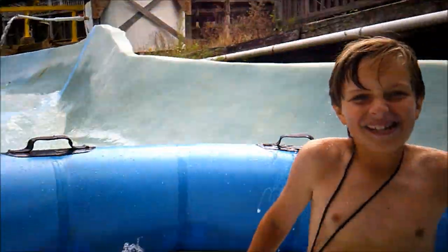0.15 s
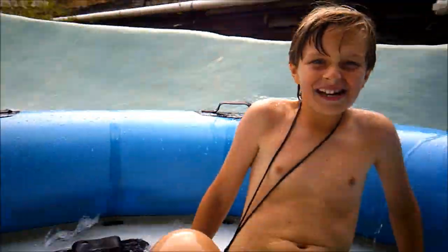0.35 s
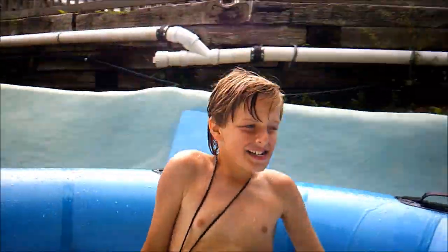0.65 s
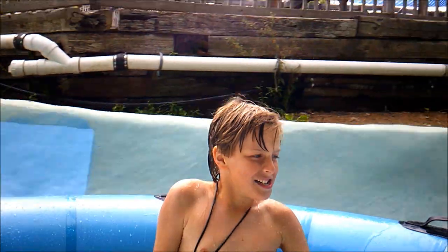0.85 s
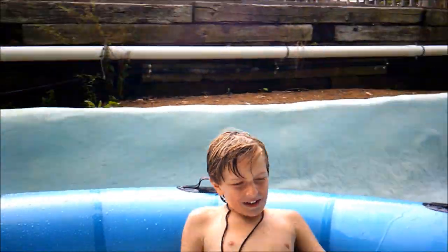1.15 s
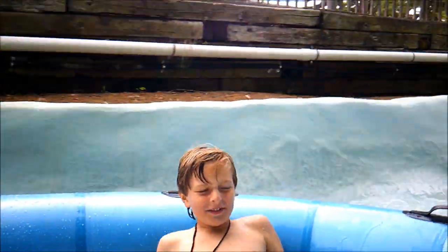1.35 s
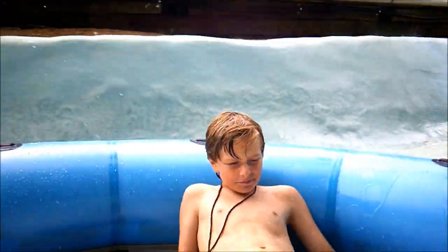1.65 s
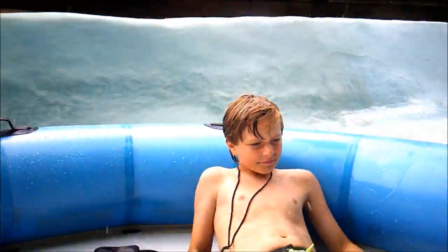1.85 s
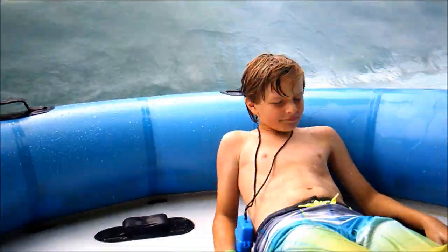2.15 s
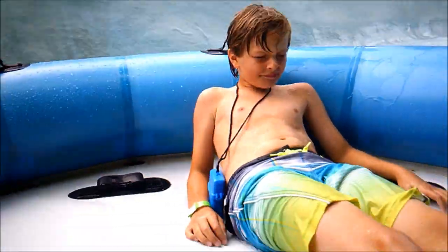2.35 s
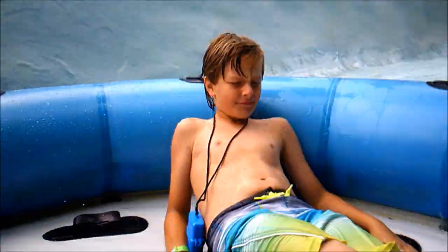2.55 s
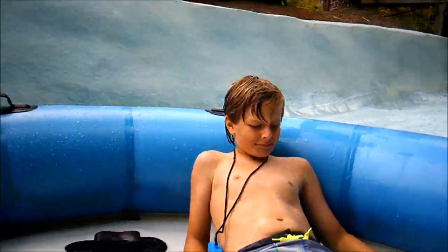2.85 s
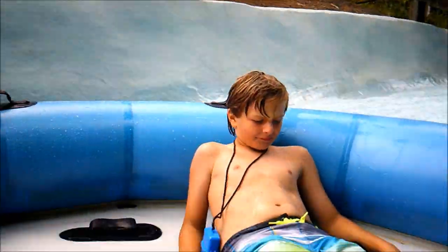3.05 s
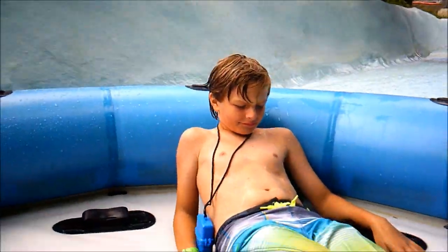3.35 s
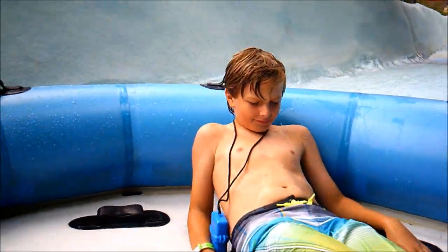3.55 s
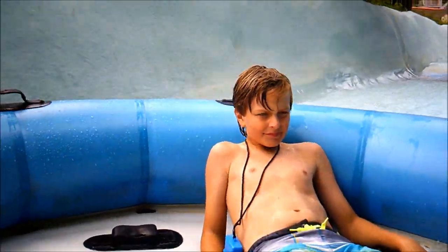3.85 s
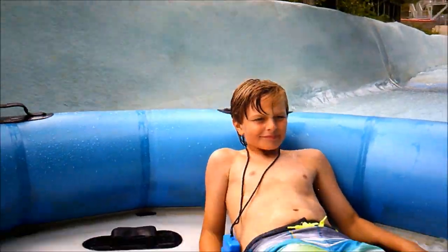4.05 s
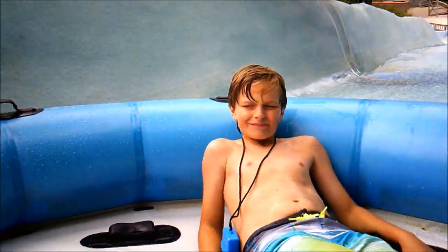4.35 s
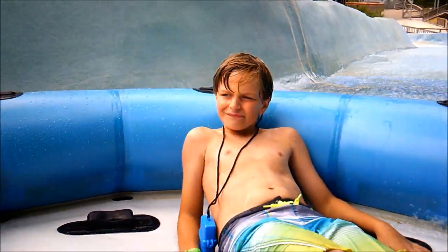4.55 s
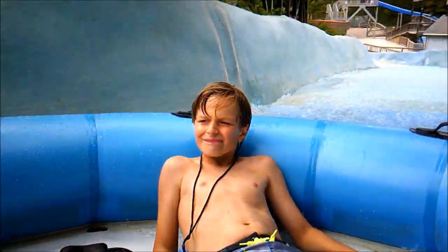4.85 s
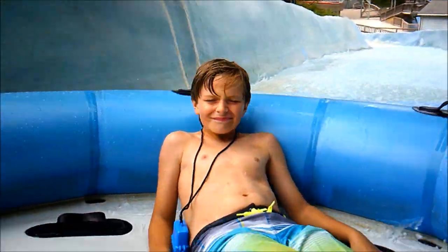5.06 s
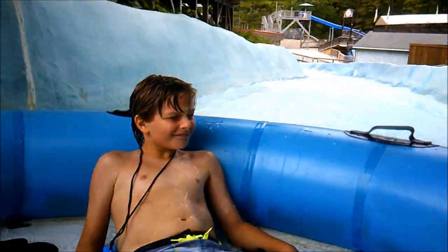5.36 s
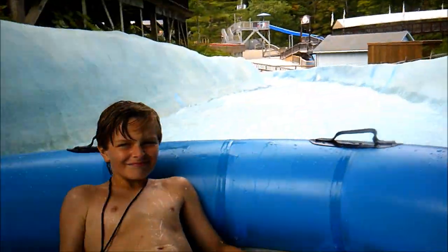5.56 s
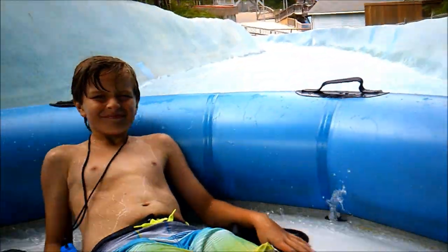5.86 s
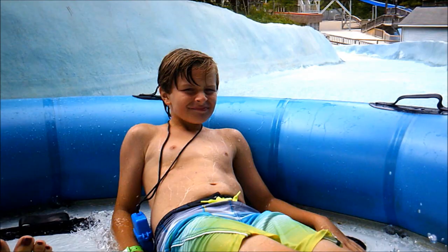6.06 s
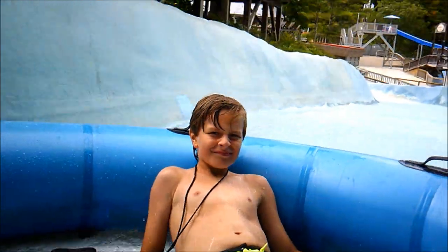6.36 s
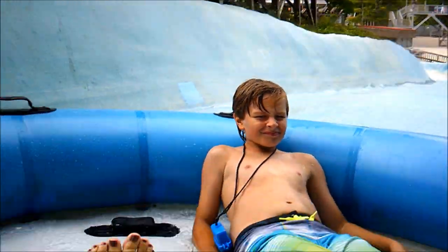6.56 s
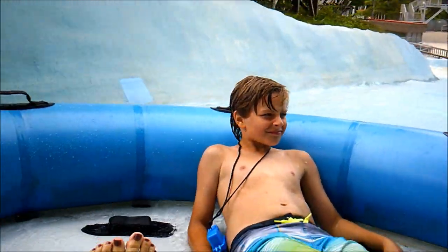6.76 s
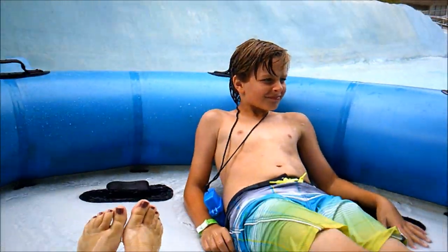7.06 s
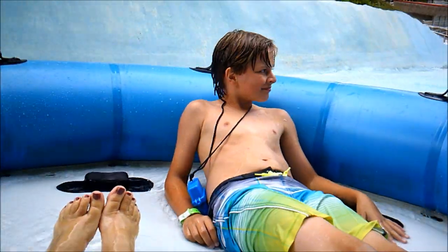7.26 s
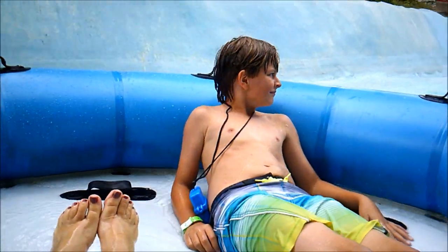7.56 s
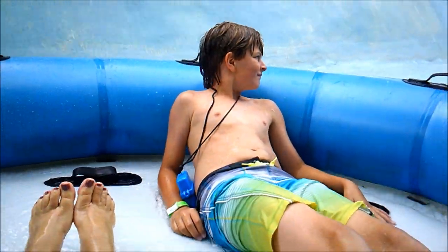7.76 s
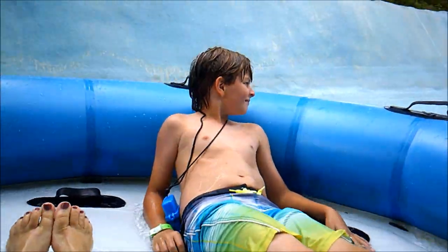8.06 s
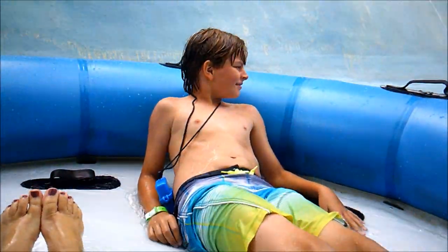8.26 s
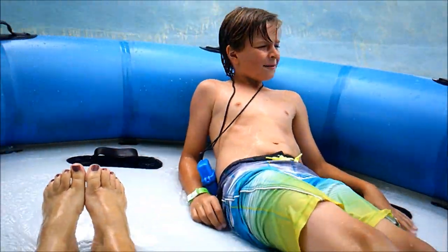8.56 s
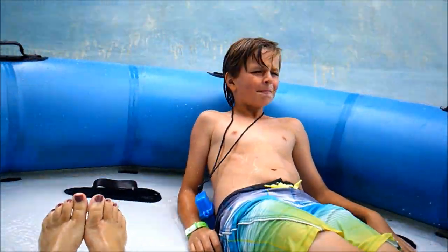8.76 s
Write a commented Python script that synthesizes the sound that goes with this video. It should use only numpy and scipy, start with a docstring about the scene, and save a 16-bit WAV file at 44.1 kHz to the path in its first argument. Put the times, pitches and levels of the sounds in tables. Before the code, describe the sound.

Muffled water churns and splashes around an inflatable raft sliding down an outdoor water slide, with low wind rumble, soft bumps and drips on the microphone case.

```python
"""An inflatable raft runs down an outdoor water slide, heard from inside a sealed case riding in it.
From the start wind rumbles on the case, the wet skin drones along the slide, and filtered noise, clicks
and bubbles make water that churns, splashes and sprays. Soft bumps, slaps, drops, glugs and breaking
wavelets soon join in; knocks come from 3.6 s, a low boom from 5.5 to 8 s and one hard tap near 5.5 s.
The case passes the lows of the water, dulls it steeply above 1.2 kHz and leaks a little treble."""
import sys
import numpy as np
from scipy import signal
from scipy.fft import rfft, irfft, next_fast_len
from scipy.io import wavfile

SR = 44100
rng = np.random.default_rng(int(sys.argv[2]) if len(sys.argv) > 2 else 0)


def persist_wave(psi):
    """Save psi, clipped to +-1, as 16-bit WAV."""
    counts = np.round(np.clip(psi, -1, 1) * 32767).astype(np.int16)
    wavfile.write(sys.argv[1], SR, np.atleast_2d(counts).T)


N = 392651
TIME = np.arange(N) / SR  # seconds

# The water that the raft ploughs through, before trims and waves.
# Each row: time in seconds, churning under the floor in dB, splashing on the tube in dB.
WATER = [(0.0, -49, -50), (0.75, -54, -52.5), (1.15, -52.5, -50), (1.85, -53.5, -51), (2.3, -50.5, -51.0),
         (3.4, -53, -55.5), (4.2, -52, -55), (5.4, -51.5, -53.5), (5.8, -50, -47.5), (6.42, -47.5, -48),
         (6.62, -50.5, -56.0), (7.4, -49.5, -55.5), (8.1, -48, -53.5), (8.52, -55, -56.0),
         (8.9, -54.5, -59.0)]
# How the case wall colours the water. Each row: frequency in Hz, relative strength in dB.
WALL = [(110, -14.5), (200, 0), (260, -0.7593), (340, 1), (450, -6.5), (700, -4), (820, -7.5), (1050, -5.5),
        (1200, -11), (1400, -20), (1650, -33.5), (2000, -48), (4500, -100)]
# Treble that leaks through the microphone seal. Each row: frequency in Hz, relative strength in dB.
SEAL = [(1300, -27), (1650, -8), (2000, -5), (2400, -1), (2700, 0.5), (3050, -5.5), (3500, -5.5),
        (4000, -9.5), (4500, -10), (5000, -16.5), (5900, -15), (6800, -21), (7400, -20.5), (8000, -25)]


def gain_of(db):
    """Turns decibels into a factor for the amplitude."""
    return 10 ** (np.asarray(db) / 20)


def evened(x):
    """Scales a sound to an average strength (rms) of 1."""
    return x / np.sqrt(np.mean(x ** 2) + 1e-20)


def follow(table, axis):
    """Draws straight lines between the dB values of one column and gives a gain per sample."""
    rows = np.array(table)
    return gain_of(np.interp(TIME, rows[:, 0], rows[:, axis]))


def add(mix, s, sound):
    """Lays a sound into the mix at time s in seconds."""
    part = mix[max(round(s * SR), 0):][:len(sound)]
    part += sound[:len(part)]


def band(x, edge_hz, kind, order=4):
    """Keeps the lows, the highs or a band between two edges; it never sounds ahead of its input."""
    return signal.sosfilt(signal.butter(order, edge_hz, kind, fs=SR, output="sos"), x)


def colour(x, points, size=8192):
    """Gives a sound the listed spectrum with a minimum-phase filter, so that clicks keep a sharp front."""
    hz, db = np.transpose(points)
    bins = abs(np.fft.fftfreq(size, 1 / SR))
    log_gain = np.log(gain_of(np.interp(np.log(bins + 1), np.log(hz + 1), db)))
    taps = np.fft.ifft(np.exp(np.conj(signal.hilbert(log_gain)))).real
    return signal.oaconvolve(x, taps[:size // 2])[:N]


def wander(rate_hz):
    """A slow random curve of rms 1, swinging from a few times a second up to about the given rate."""
    size = next_fast_len(N, True)
    hz = np.fft.rfftfreq(size, 1 / SR)
    weight = np.exp(-(hz / rate_hz) ** 2) * hz / (hz + 5)
    return evened(irfft(rfft(rng.standard_normal(size)) * weight, size)[:N])


def impacts(per_s, spread_db):
    """Random clicks of either sign: many small, a few large."""
    size = gain_of(spread_db * np.minimum(rng.exponential(1, N), 3.5))
    return size * rng.choice([-1., 1.], N) * (rng.random(N) < per_s / SR)


def ring(hz, swell_s, glide=0):
    """A tone that swells to 1 in swell_s and dies away; glide raises its pitch as it goes."""
    age = np.arange(int(10 * swell_s * SR) + 2) / (swell_s * SR)
    return age * np.exp(1 - age) * np.sin(2 * np.pi * hz * swell_s * age * (1 + glide * age))


def bubbles(low_hz, high_hz, cycles, spread_db, glide, count):
    """Bubbles of many sizes at random moments, each ringing for a few cycles and rising in pitch."""
    out = np.zeros(N)
    for when, size, luck in rng.random((count, 3)):
        hz = low_hz * (high_hz / low_hz) ** size
        db = -spread_db * np.log(luck + .03)  # a few are much louder
        add(out, when * N / SR, gain_of(db) * ring(hz, cycles / hz, glide))
    return evened(out)


def clumped(x, depth_db, width_hz, life_s, size=512):
    """Bubbles of like size come in clusters: patches of time and pitch swell while others thin."""
    z = signal.stft(x, nperseg=size)[2]
    across = signal.windows.gaussian(31, width_hz * size / SR / np.pi)
    along = signal.windows.gaussian(31, life_s * 2 * SR / size / np.pi)
    patches = signal.fftconvolve(rng.standard_normal(z.shape), np.outer(across, along), "same")
    return signal.istft(z * gain_of(depth_db * evened(patches)), nperseg=size)[1][:N]


def swell(s, length_s):
    """A smooth rise from 0 to 1 and back, with its crest at time s."""
    return np.cos(np.pi * np.clip((TIME - s) / length_s, -.5, .5)) ** 2


def wave_rise(axis):
    """The dB that the passing waves add, under the floor (axis 2) or along the tube (axis 3)."""
    # Waves that the raft runs over. Each row: crest in seconds, length in seconds,
    # rise under the floor in dB, rise along the tube in dB.
    waves = [(0.18, 0.1125, 2, 3), (0.517, 0.235, 3, 3.5), (1.151, 0.2363, 0, 2.0), (1.6, 0.4723, 4.0, 0.0),
             (1.761, 0.1121, 4, 2.5), (2.35, 0.1845, 6, 4), (2.711, 0.3218, 5.0, 1.5),
             (2.93, 0.1349, 3.5, 2.5), (4.02, 0.129, 3, 2.5), (4.383, 0.2829, 3.5, 2.5),
             (5.343, 0.2394, -0.5, 4), (5.551, 0.1917, 3.0, 3), (5.932, 0.3215, 1.5, 5.0),
             (6.01, 0.2567, 5, 0.5), (6.241, 0.12, 4, 1.5), (7.272, 0.19, 7.5, 0.5),
             (7.451, 0.1185, 4.0, 3), (7.74, 0.4934, 3.5, 0.5), (8.31, 0.3719, 6, 4),
             (8.411, 0.1393, 2.5, 4.5), (8.769, 0.459, 8.0, 9)]
    return sum(row[axis] * swell(row[0], row[1]) for row in waves)


def wind(trim_db=0.9985, eddy_db=1.5, gust_s=.17):
    """Eddies shed by the case make a lumpy rumble that jumps with each buffet."""
    # The air stream on the case. Each row: time in seconds, level in dB before trim and buffets.
    stream = [(0, -45.5), (0.7, -50.5), (1.1, -49.5), (1.4, -47.5), (3.8, -47.0), (4.05, -44), (4.6, -46.5),
              (5.1, -47), (5.7, -46.5), (7.8, -44), (8.35, -44), (8.65, -48), (8.9, -45)]
    # The rumble's spectrum. Each row: frequency in Hz, relative strength in dB.
    rumble_colour = [(3, -9.5), (10, 1), (19, -6), (32, -8.5), (52, -13), (78, -12), (110, -14.5),
                     (160, -26), (300, -45), (900, -110)]
    # Single buffets of air. Each row: crest in seconds, rise in dB.
    gusts = [(0.17, 4), (0.51, 4.0), (1.97, 2), (2.4, 3), (2.64, 3.5), (3.61, 2.0), (5.71, 4), (6.09, 7.5),
             (7.9, 2)]
    rumble = colour(rng.standard_normal(N), rumble_colour, size=32768)
    eddies = evened(rumble * gain_of(eddy_db * wander(20)))
    buffets = sum(db * swell(s, gust_s) for s, db in gusts)
    return gain_of(trim_db + buffets) * follow(stream, 1) * eddies


def rubbing(trim_db=-2.5, lurch_db=1.6362, skid_s=.16):
    """The wet skin drags unevenly over the slide and the air-filled tube drones with it."""
    # The drone's spectrum. Each row: frequency in Hz, relative strength in dB.
    tube_colour = [(60, -22), (100, -4.5), (135, 0), (170, -0.5), (215, -6), (280, -15.5), (500, -40),
                   (1300, -110)]
    # How hard the skin drags. Each row: time in seconds, level in dB before trim and grip.
    drag = [(0, -47.0), (0.5, -46.5), (0.7, -53.5), (1.2, -46), (2.8, -47.5), (3.1, -50.5), (4.4, -49.5),
            (5.3, -49.0), (6.2, -48), (6.9, -47.5), (7.85, -47.5), (8.0, -50.5), (8.15, -45.5),
            (8.5, -53.5), (8.9, -50)]
    # Moments when the skin grips harder. Each row: crest in seconds, rise in dB.
    skids = [(0.05, 3.5), (0.2, 3.5), (1.67, 3.0), (1.95, 4), (4.01, 5.0), (5.48, 2.5), (7.08, 4),
             (7.31, 4.5), (7.46, 3), (7.87, 4.5)]
    drone = evened(colour(rng.standard_normal(N), tube_colour) * gain_of(lurch_db * wander(25)))
    grip = sum(db * swell(s, skid_s) for s, db in skids)
    return gain_of(trim_db + grip) * follow(drag, 1) * drone


def churn(slosh, trim_db=-3.0, pat_db=-1, bubble_db=-4, slosh_db=1.1331, clump_db=2.5,
          low_hz=205, split_hz=400, calm_db=-51, brighten=0.33):
    """Water squeezed under the floor washes, pats and bubbles, brighter as the bow wave grows."""
    pats = evened(impacts(per_s=300, spread_db=1.5))
    drive = rng.standard_normal(N) + gain_of(pat_db) * pats
    gurgle = bubbles(264.54, 620.94, cycles=1.3367, spread_db=3.0, glide=0.011, count=560)
    wash = evened(band(colour(drive, WALL), [low_hz, 570], "band", order=3))
    heard = clumped(wash + gain_of(bubble_db) * gurgle, clump_db, width_hz=200, life_s=.045)
    heard = evened(heard * gain_of(slosh_db * slosh))
    # the bow wave's strength compared with calm water lifts the upper part
    bow = follow(WATER, 2) * gain_of(wave_rise(axis=3) - calm_db)
    lows = band(heard, split_hz, "low", order=3)
    highs = band(heard, split_hz, "high", order=3)
    heard = lows + bow ** brighten * highs
    return gain_of(trim_db + wave_rise(axis=2)) * follow(WATER, 1) * heard


def splash(surge, slosh, trim_db=-4, pat_db=-1.5, bubble_db=-5, surge_db=1.5828, slosh_db=0.2511,
           clump_db=2.5):
    """The bow wave rushes along the tube and breaks on it in pats and small bubbles."""
    pats = evened(impacts(per_s=600, spread_db=3))
    drive = rng.standard_normal(N) + gain_of(pat_db) * pats
    small_bubbles = bubbles(650.39, 1254.5, cycles=1.7, spread_db=3.5, glide=0.0066, count=1100)
    gurgle = evened(colour(small_bubbles, WALL))
    rush = evened(band(colour(drive, WALL), 550, "high", order=3))
    heard = clumped(rush + gain_of(bubble_db) * gurgle, clump_db, width_hz=320, life_s=.028)
    heard = heard * gain_of(surge_db * surge + slosh_db * slosh)
    return gain_of(trim_db + wave_rise(axis=3)) * follow(WATER, 2) * evened(heard)


def spray(surge, slosh, trim_db=-3.5, tick_db=-1.0, bubble_db=-3.0, surge_db=1.0005, slosh_db=0.3936,
          clump_db=2.0, mist_hz=4300, wave_share=0.7075):
    """Foam fizzes and fine drops tick, rising with each surge; the finest mist brightens it."""
    # Spray thrown up by the bow. Each row: time in seconds, level in dB before trim and waves,
    # lift of the finest mist (above mist_hz) in dB.
    thrown = [(0, -65, 3), (0.65, -67, 2), (0.82, -68, 0), (1.15, -66.5, 1), (1.85, -67, 1.5),
              (2.3, -65, 1.5), (3.28, -70, 1), (3.44, -72.5, -3), (3.6, -70, 1), (4.2, -68.5, 0.5),
              (5.45, -66, 0.5), (5.7, -59.5, 0), (5.92, -61.5, 0.5), (6.1, -62, 1), (6.42, -64, 1),
              (6.58, -68.5, -1), (7.13, -70, 0.5), (7.35, -71, 1), (7.75, -70.5, 1.5), (8.15, -67.5, 2),
              (8.52, -69.5, 3), (8.9, -71.5, 0)]
    ticks = evened(impacts(per_s=450, spread_db=3))
    drive = rng.standard_normal(N) + gain_of(tick_db) * ticks
    fizz = evened(colour(bubbles(2200, 6800, cycles=4, spread_db=3.5, glide=.005, count=1800), SEAL))
    heard = evened(colour(drive, SEAL)) + gain_of(bubble_db) * fizz
    heard = clumped(heard, clump_db, width_hz=900, life_s=.016)
    heard = evened(heard * gain_of(surge_db * surge + slosh_db * slosh))
    drops = band(heard, mist_hz, "low", order=3)
    mist = band(heard, mist_hz, "high", order=3)
    heard = drops + follow(thrown, 2) * mist
    # only a share of each wave's rise along the tube goes into spray
    return gain_of(trim_db + wave_share * wave_rise(axis=3)) * follow(thrown, 1) * heard


def steady_hiss(level_db=-80, low_hz=1000, high_hz=1900):
    """A faint steady hiss lies under the water, strongest between 1 and 2 kHz."""
    return gain_of(level_db) * evened(band(rng.standard_normal(N), [low_hz, high_hz], "band", order=1))


def bumps(cycles=0.9348):
    """The tube bumps softly against the slide and its air answers with a thump of a few cycles."""
    # Each row: start in seconds, peak in dB, pitch in Hz.
    thumps = [(0.025, -34.5, 110.4), (1.15, -43.5, 164.8), (1.945, -42.5, 79), (2.175, -43.5, 189.8),
              (3.585, -41.5, 51.82), (4.115, -35.5, 31.99), (5.52, -37.5, 78.74), (5.672, -37, 158.9),
              (6.333, -39.5, 100.2), (6.543, -41.5, 79.43), (7.094, -39.5, 195.4), (7.305, -32, 131.2),
              (7.405, -39.5, 79), (7.875, -36.5, 110)]
    out = np.zeros(N)
    for s, db, hz in thumps:
        add(out, s, gain_of(db) * ring(hz, cycles / hz))
    return out


def slaps(trim_db=5.0, swell_s=0.0007063, slop_db=-16, slop_s=.01, drops_db=-32, drops_s=.012,
          small_db=-48, small_hz=900, count=8):
    """Wavelets slap the tube: its skin rings briefly, then a short slop and a few drops follow."""
    # The loudest slaps. Each row: start in seconds, peak in dB before trim and filter, pitch in Hz.
    loud = [(0.069, -43.5, 785), (0.508, -39, 850), (0.593, -44.5, 960), (0.7528, -44, 850),
            (1.0496, -43, 1050), (1.121, -43, 1100), (1.203, -43, 940), (1.412, -44.5, 890),
            (1.4412, -42.5, 850), (1.76, -40, 700), (1.9168, -43.5, 1030), (2.0034, -42, 890),
            (2.5495, -38, 950), (2.8884, -41.5, 950), (3.0955, -45, 1000), (3.2208, -43.5, 801.3),
            (3.2446, -41.5, 650), (3.279, -39, 680), (4.0144, -39, 950), (4.571, -43.5, 950),
            (4.6814, -38, 775.1), (4.6996, -38.5, 800), (5.5207, -46, 760), (5.5948, -41, 700),
            (5.8477, -39.5, 830), (5.8756, -34, 760), (6.152, -40.5, 950), (6.2179, -40.5, 560),
            (6.304, -41.5, 620), (6.342, -42, 1100), (6.5177, -37, 916.9), (6.525, -45, 1250),
            (6.6594, -44, 1076), (6.7766, -36.5, 770), (7.009, -42, 842.6), (7.105, -47.5, 1080),
            (8.0, -45, 720), (8.157, -45.5, 880), (8.3884, -39, 670), (8.4393, -40.5, 1088),
            (8.594, -45.5, 820)]
    out, flung, t = np.zeros(N), np.zeros(N), np.arange(SR // 12) / SR
    # small slaps fall at random
    small = [(when * N / SR, small_db, small_hz * 2 ** (.5 * (size - .5)))
             for when, size in rng.random((count, 2))]
    for s, db, hz in loud + small:
        slop = evened(band(rng.standard_normal(len(t)), [0.732 * hz, 1.2862 * hz], "band", order=2))
        add(out, s, gain_of(db) * ring(hz, swell_s))
        add(out, s, gain_of(db + slop_db) * slop * np.exp(-t / slop_s))
        add(flung, s, gain_of(db + drops_db) * np.exp(-t / drops_s))
    drops = evened(band(impacts(per_s=1500, spread_db=1.5), [1250, 4500], "band", order=2))
    return gain_of(trim_db) * band(out, 1341.3, "low", order=7) + flung * drops


def spatters(trim_db=-2.5, spread=1.3233, plip_db=-11, cycles=3, small_db=-64, small_s=.06,
             small_hz=4300, count=10):
    """Each handful of drops lands with one clear plip and thins out; drop size sets the pitch."""
    # The largest handfuls. Each row: start in seconds, starting level in dB before trim,
    # time to fade by 60 dB in seconds, pitch of the drops in Hz.
    large = [(0.16, -63, 0.5019, 3900), (0.503, -60, 0.0031, 4200), (0.585, -64.5, 0.0353, 4500),
             (0.922, -57.5, 0.127, 2998), (1.131, -61.5, 0.2142, 4002), (1.97, -58, 0.0433, 3696),
             (2.66, -63, 0.2958, 4490), (3.5318, -63, 0.0568, 4402), (3.835, -63.5, 0.1711, 4500),
             (3.86, -59, 0.2173, 2493), (5.6, -63, 0.1339, 6001), (5.6826, -55, 0.15, 3606),
             (5.755, -60, 0.1145, 5000), (5.805, -58, 0.0652, 4399), (5.914, -56, 0.1438, 4806),
             (6.22, -60.5, 0.0815, 5507), (6.337, -57.5, 0.0975, 3909), (6.3836, -60.5, 0.0058, 3200),
             (6.5176, -57, 0.0786, 3624), (7.105, -67, 0.3618, 5500), (7.5917, -61.5, 0.057, 3200),
             (7.88, -64, 0.264, 5182), (8.04, -62, 0.0734, 2800), (8.125, -62.5, 0.1433, 3782),
             (8.184, -60.5, 0.014, 3800), (8.3182, -59, 0.1471, 3400), (8.37, -57.5, 0.1144, 3400),
             (8.44, -62, 0.2693, 4501), (8.797, -62, 0.055, 3500)]
    out, t = np.zeros(N), np.arange(SR // 5) / SR
    drops = np.pad(colour(impacts(per_s=700, spread_db=2.5), SEAL), (0, len(t)), "wrap")
    # small handfuls fall at random
    small = [(when * (N - len(t)) / SR, small_db, small_s, small_hz * 2 ** (size - .5))
             for when, size in rng.random((count, 2))]
    for s, db, t60, hz in large + small:
        handful = band(drops[round(s * SR):][:len(t)], [hz / spread, hz * spread], "band", order=1)
        add(out, s, evened(handful) * gain_of(db - 60 * t / t60))
        add(out, s, gain_of(db + plip_db) * evened(ring(hz, cycles / hz)))
    return gain_of(trim_db) * out


def drips(trim_db=-1.5382, cycles=2.472, burst_db=-11, burst_s=0.0044, top_hz=5800):
    """Single drops hit the case, each with a sharp plip, and burst in a few milliseconds."""
    # Each row: start in seconds, peak in dB before trim and filter, pitch in Hz.
    hits = [(0.169, -51.5, 2900), (0.582, -54, 2900), (0.927, -54, 2100), (0.993, -58, 4200),
            (1.134, -51.5, 2860), (1.286, -55, 2230), (1.342, -59, 4700), (1.362, -57, 5771),
            (1.977, -55.5, 4700), (2.254, -55.5, 2830), (2.359, -53, 3800), (2.400, -55, 3800),
            (2.787, -55, 3100), (3.066, -58, 3070), (3.290, -56.5, 2900), (3.531, -54, 3800),
            (4.207, -55, 3700), (4.288, -54.5, 3000), (4.683, -59, 4700), (4.701, -62, 6500),
            (4.879, -55.5, 2700), (5.037, -54.5, 2600), (5.141, -53.5, 3070), (5.708, -49, 2930),
            (6.2595, -54, 3800), (6.383, -53, 2300), (6.670, -47.5, 2800), (7.591, -55.5, 3800),
            (7.8242, -56.5, 3900), (8.012, -55, 4200), (8.126, -56, 2930), (8.186, -53.5, 3600),
            (8.336, -54, 3400), (8.375, -53, 3800)]
    out, t = np.zeros(N), np.arange(SR // 30) / SR
    for s, db, hz in hits:
        burst = evened(band(rng.standard_normal(len(t)), [.65 * hz, 1.4345 * hz], "band", order=2))
        add(out, s, gain_of(db) * ring(hz, cycles / hz))
        add(out, s, gain_of(db + burst_db) * burst * np.exp(-t / burst_s))
    return gain_of(trim_db) * band(out, top_hz, "low", order=2)


def glugs(glide=0.0027):
    """Large single bubbles stand out from the wash, each a short tone that rises slightly."""
    # Each row: start in seconds, peak in dB, pitch in Hz, swell time in seconds.
    large_bubbles = [(0.358, -36.5, 289.6, 0.003137), (0.575, -45.5, 469.3, 0.00297),
                     (0.637, -43.5, 299.9, 0.004414), (0.962, -47, 663.9, 0.003257),
                     (2.357, -44, 543.7, 0.002967), (2.475, -44.5, 988.3, 0.00314),
                     (2.925, -43, 300.8, 0.00361), (2.961, -45, 988.4, 0.003107),
                     (3.119, -44.5, 300, 0.00274), (3.286, -44.5, 758.1, 0.003762),
                     (3.503, -40, 408.8, 0.002875), (4.882, -46, 468.7, 0.0029),
                     (5.287, -43.5, 329.9, 0.002878), (6.043, -39, 299.5, 0.00502),
                     (6.083, -38.5, 328.9, 0.003954), (6.218, -40.5, 447.3, 0.00377),
                     (6.25, -41, 421.6, 0.00287), (6.447, -42, 485.1, 0.004282),
                     (7.238, -39, 344.5, 0.01218), (7.352, -48, 727, 0.005134),
                     (8.016, -41.5, 399.3, 0.00295), (8.41, -38, 468.6, 0.002998),
                     (8.721, -42, 391.2, 0.002657)]
    out = np.zeros(N)
    for s, db, hz, swell_s in large_bubbles:
        add(out, s, gain_of(db) * ring(hz, swell_s, glide))
    return out


def breakers(per_s=190, jitter=.4, scatter=0.411, cycles=0.5846, uneven_db=2.0, fade_db=3, count=14):
    """A breaking wavelet pats the tube in a quick run of mixed pitches and weakens as it collapses."""
    # Each row: start in seconds, length in seconds, peak in dB before unevenness, fade and filter,
    # middle pitch in Hz.
    runs = [(0.756, 0.02216, -41, 856.9), (1.53, 0.0452, -43.5, 858.6), (2.335, 0.02881, -43.5, 830),
            (2.657, 0.02808, -39.5, 869.2), (5.535, 0.03098, -43, 738.1), (5.882, 0.0448, -37, 763.8),
            (5.975, .032, -36, 748.6), (6.227, .03, -41, 715.9), (8.268, 0.02506, -37, 721.5),
            (8.32, 0.024934, -40, 760.7), (8.39, 0.03026, -39, 638.2)]
    out = np.zeros(N)
    for s, length_s, db, hz in runs:
        for k, (late, pitch, size) in enumerate(rng.uniform(-1, 1, (count, 3))):
            age = (k + jitter * late) / per_s
            pat_hz = hz * 2 ** (scatter * pitch)
            if age < length_s:
                pat_db = db + uneven_db * size - fade_db * age / length_s
                add(out, s + age, gain_of(pat_db) * ring(pat_hz, cycles / pat_hz))
    return band(out, 1272.8, "low", order=8)


def knocks(trim_db=6, pitch_hz=330, swell_s=0.00058):
    """The soft floor takes a ridge in the slide as one quick push."""
    # Each row: start in seconds, peak in dB before trim and filter.
    ridges = [(3.5953, -45), (4.1307, -41), (5.2736, -40), (6.345, -38.5), (7.0702, -38.5), (7.3085, -33),
              (7.417, -39), (7.4680, -35)]
    out = np.zeros(N)
    for s, db in ridges:
        add(out, s, -gain_of(db) * ring(pitch_hz, swell_s))
    return gain_of(trim_db) * band(out, 1200, "low", order=6)


def drumming(level_db=-51.5, low_hz=65, high_hz=103, start_s=5.5, end_s=8.05, fade_s=0.18, lurch_db=2.5):
    """For a stretch the raft floor flutters over the slide with a low, uneven boom."""
    flutter = band(rng.standard_normal(N), [low_hz, high_hz], "band", order=2)
    boom = evened(flutter * gain_of(lurch_db * wander(20)))
    fade = np.clip(np.minimum(TIME - start_s, end_s - TIME) / fade_s, 0, 1)
    return gain_of(level_db) * fade * boom


def case_tap(s=5.5207, trim_db=-36.0, pitch_hz=2650, swell_s=0.0002439, tail_db=-20, tail_s=0.01008,
             low_hz=1750, high_hz=3250):
    """One heavy drop knocks on the case, which rattles briefly."""
    out, t = np.zeros(N), np.arange(SR // 20) / SR
    rattle = evened(band(rng.standard_normal(len(t)), [low_hz, high_hz], "band"))
    add(out, s, ring(pitch_hz, swell_s))
    add(out, s, gain_of(tail_db) * rattle * np.exp(-t / tail_s))
    return gain_of(trim_db) * band(out, [low_hz, high_hz], "band", order=3)


def scene():
    """Wind, raft and water; one slosh sways all the wash, one quick surge ties splash to spray."""
    surge, slosh = wander(35), wander(10)
    raft = rubbing() + bumps() + knocks() + drumming()
    wash = churn(slosh) + splash(surge, slosh) + spray(surge, slosh)
    water = wash + steady_hiss() + slaps() + glugs() + breakers()
    drops = spatters() + drips() + case_tap()
    return (wind() + raft + water + drops)[None]


def record(dry, edge_hz=7850, hiss_db=-99):
    """The camera cuts everything above an edge and adds a trace of electronic hiss."""
    low_pass = signal.firwin(401, edge_hz, window=("kaiser", 8), fs=SR)
    heard = signal.oaconvolve(dry, low_pass[None], "same")
    return heard + gain_of(hiss_db) * band(rng.standard_normal(N), 16000, "low", order=8)


dry = scene()
out = record(dry)
persist_wave(out)
```